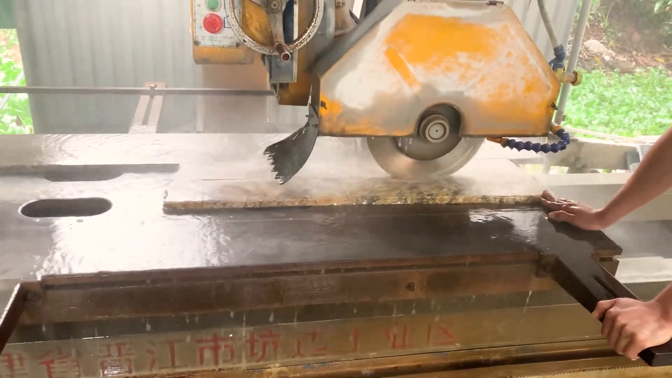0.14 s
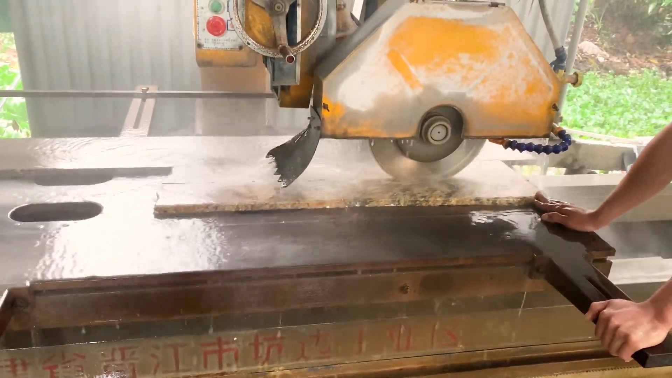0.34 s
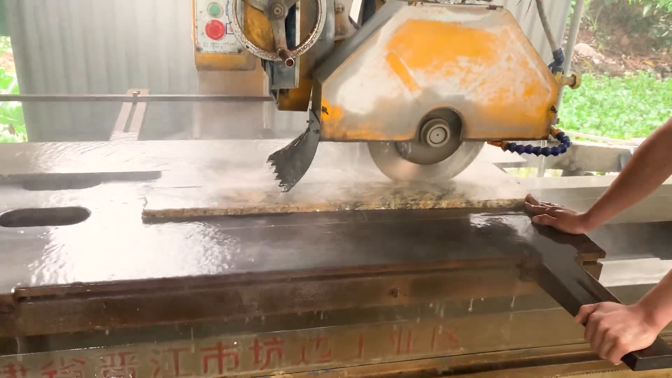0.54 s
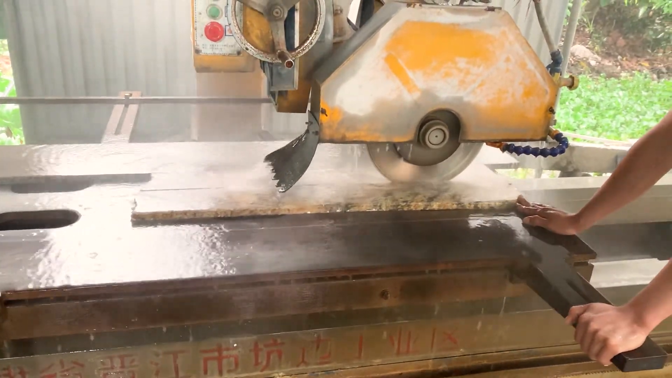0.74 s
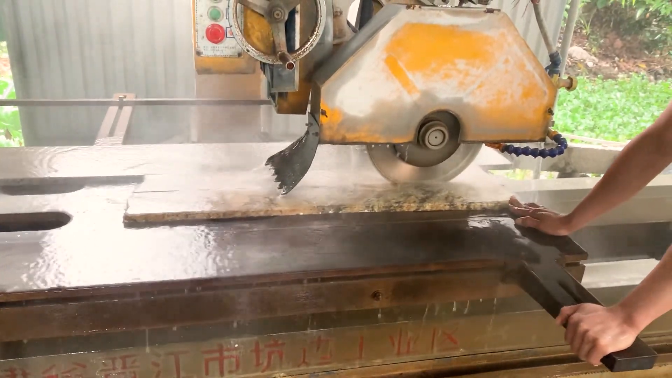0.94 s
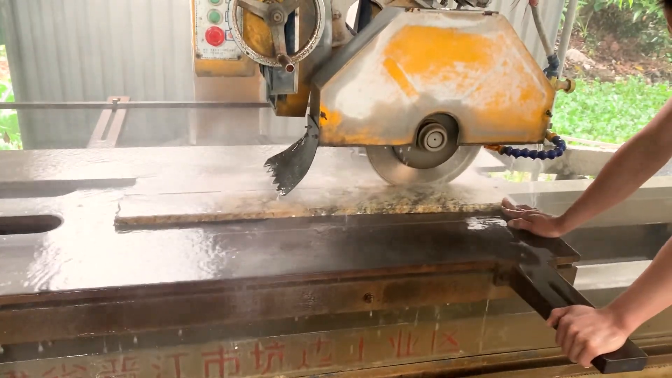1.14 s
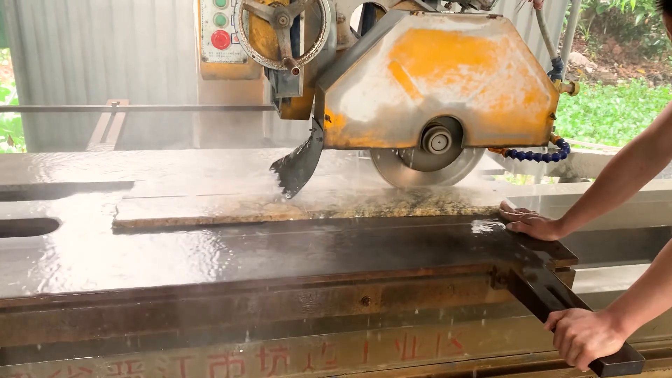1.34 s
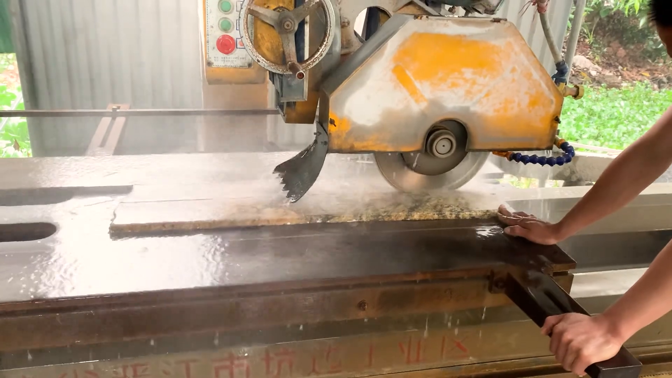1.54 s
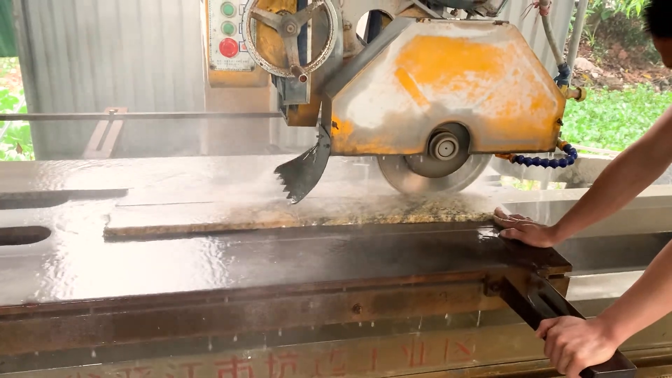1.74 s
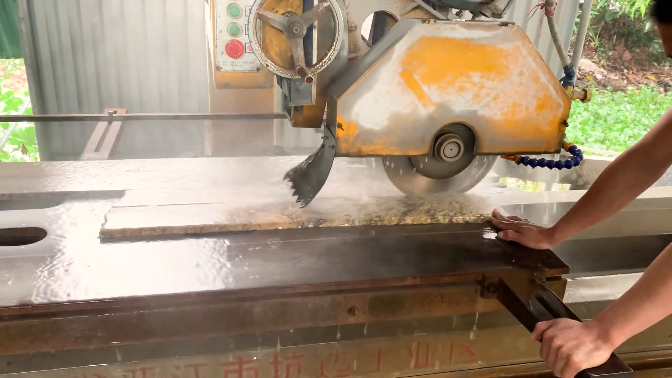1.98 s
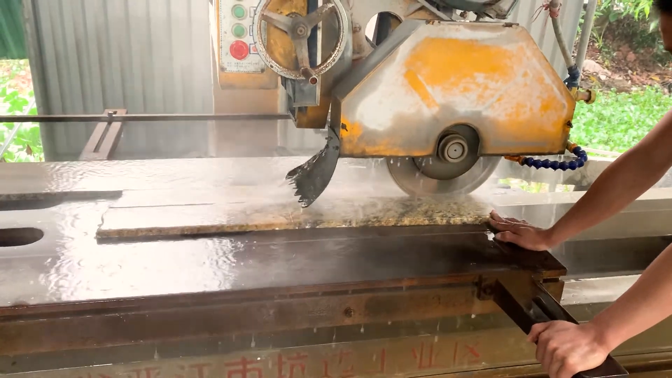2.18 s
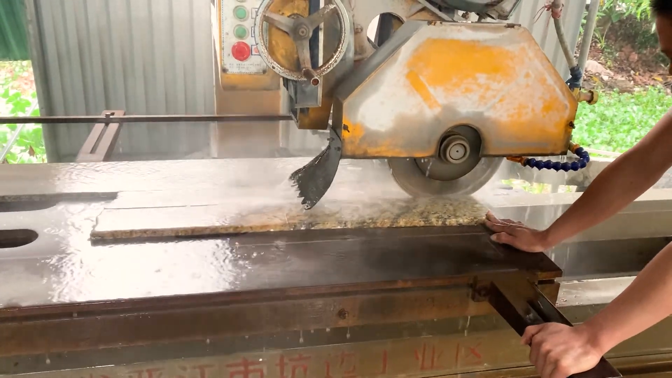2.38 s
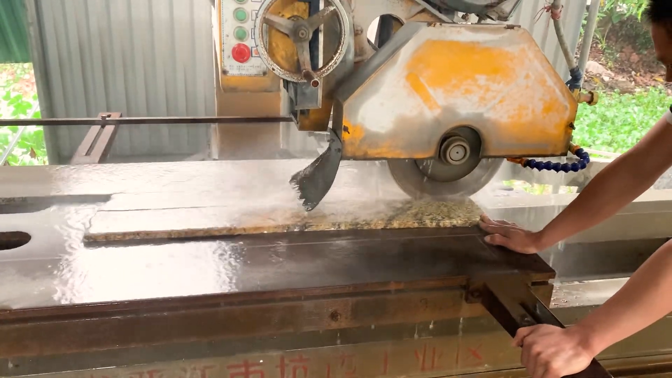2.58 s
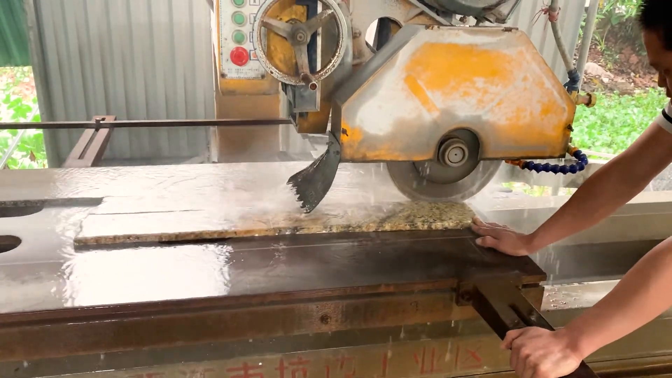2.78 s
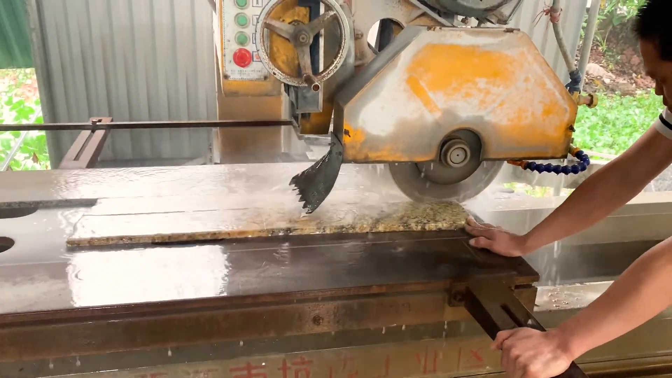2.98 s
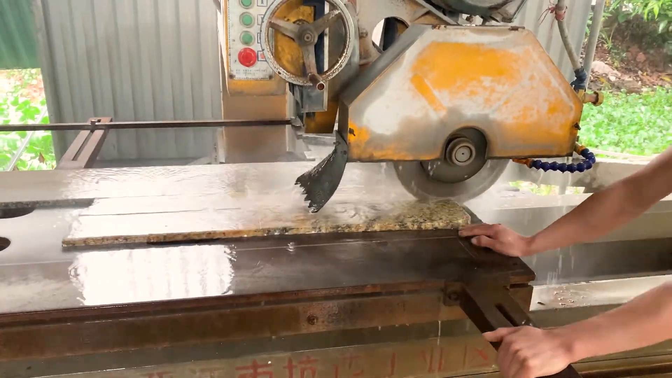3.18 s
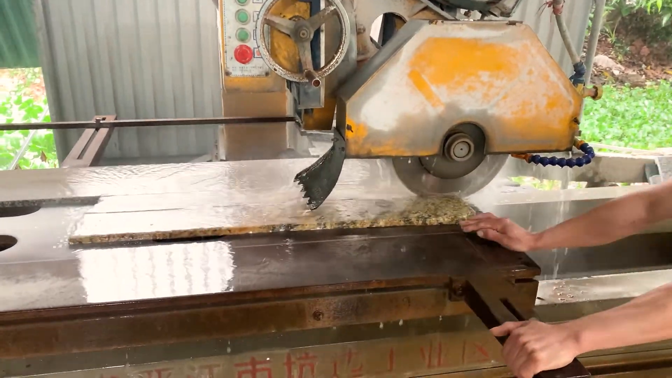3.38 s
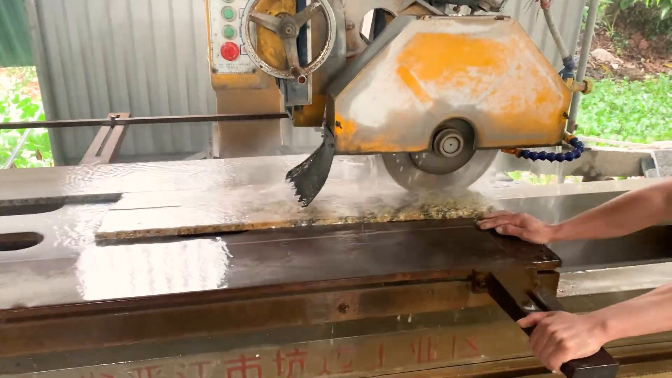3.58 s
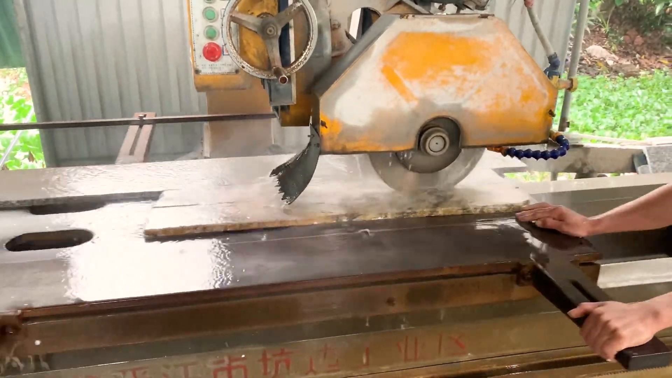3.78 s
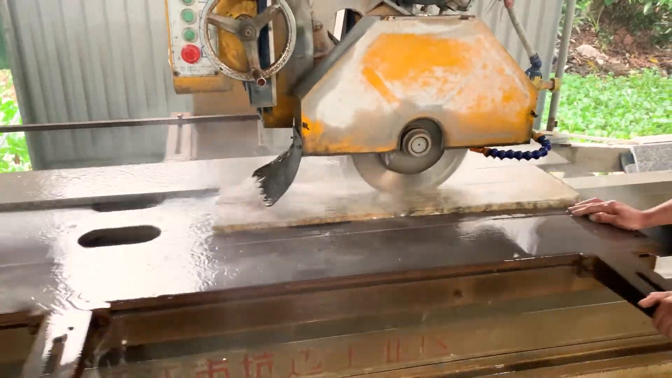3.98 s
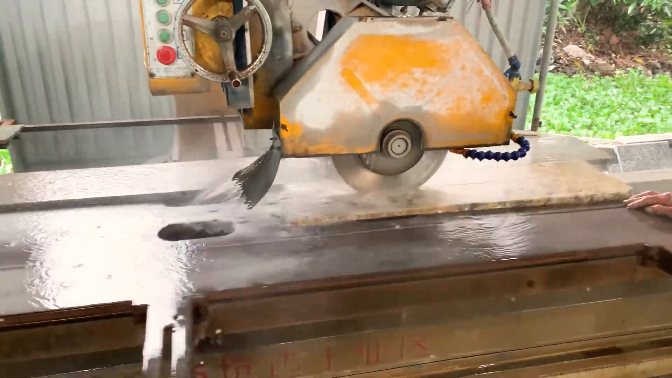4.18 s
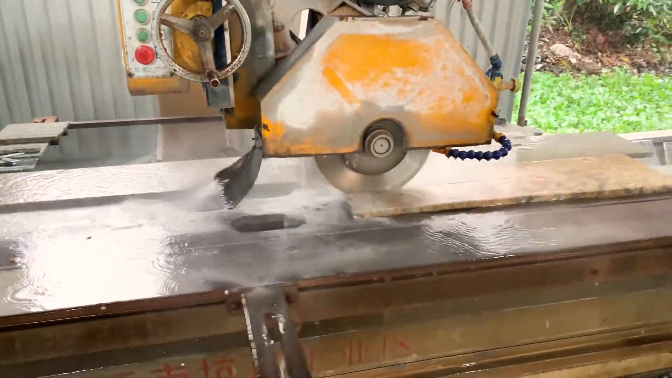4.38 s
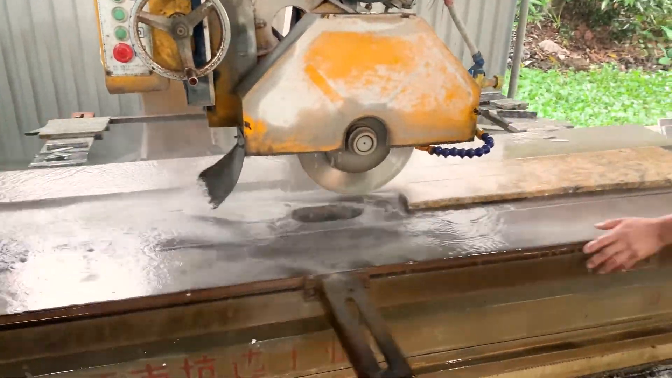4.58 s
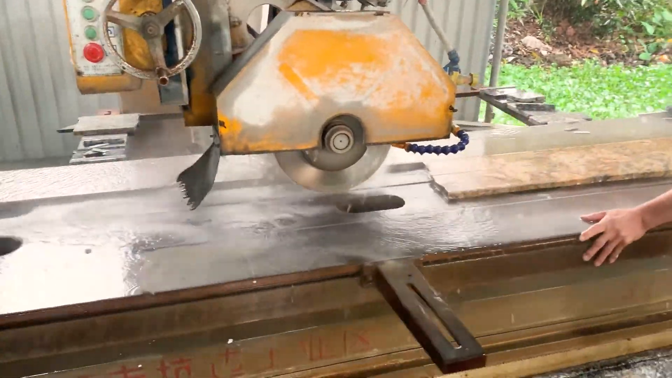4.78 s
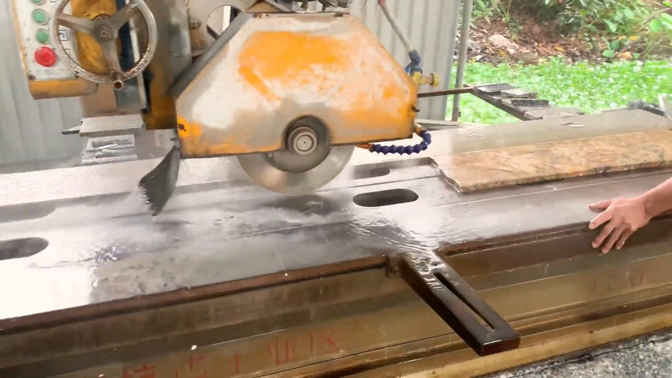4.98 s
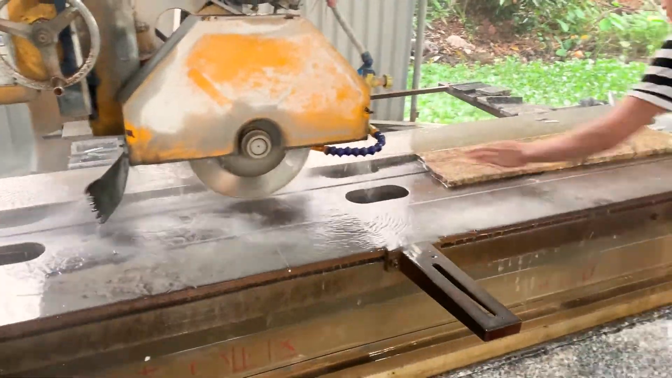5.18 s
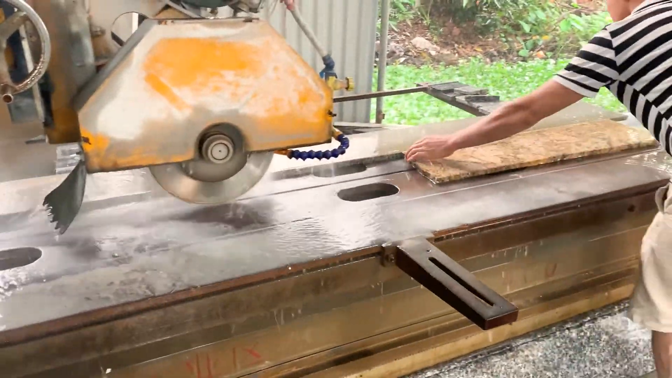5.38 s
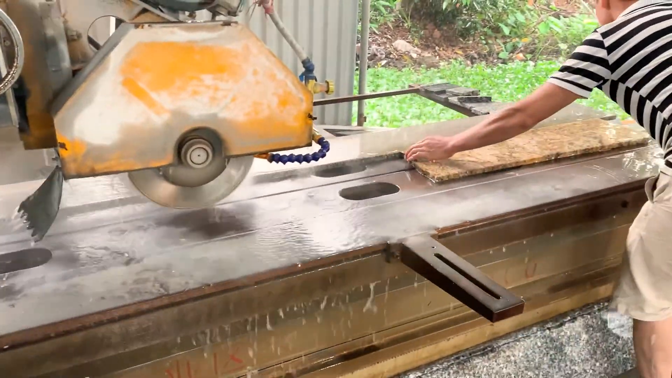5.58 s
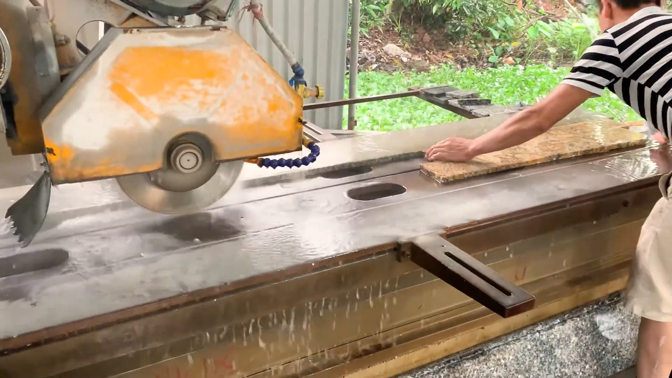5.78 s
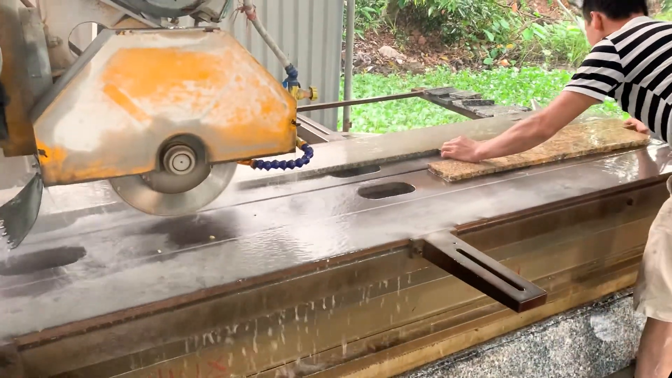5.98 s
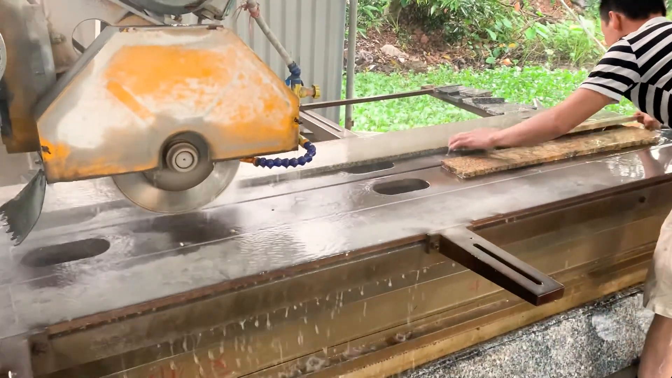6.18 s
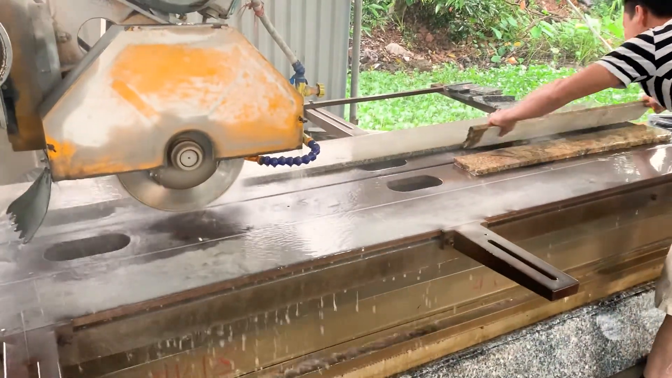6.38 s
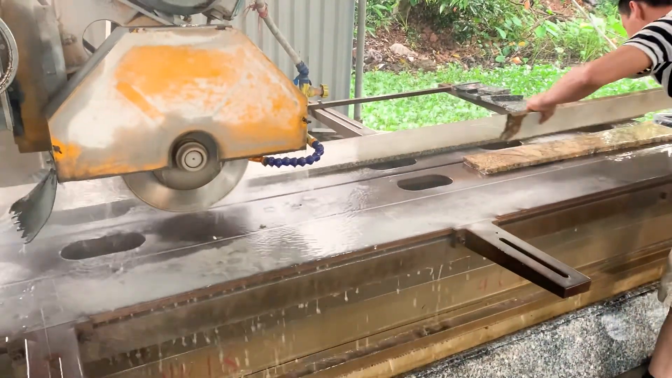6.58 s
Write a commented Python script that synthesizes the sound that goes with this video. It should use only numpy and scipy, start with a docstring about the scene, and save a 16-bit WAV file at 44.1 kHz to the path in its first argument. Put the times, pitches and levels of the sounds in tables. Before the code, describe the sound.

A water-cooled stone saw whines and rasps loudly through granite, breaks out and spins free over quiet wet wash, then a harsh electric buzz starts.

```python
"""A water-cooled saw cuts a granite slab in an open workshop, close to the microphone.
Its uneven rim rasps as a comb of multiples of the blade speed; its 24 diamond segments make the disc whine,
drone and squeal, and filtered noise makes the hiss of grit and spray.
The blade breaks out of the slab and spins free over a bed of wash, hum and faint whistles.
A second later a mains-driven machine starts to buzz: harmonics of about 100 Hz with hiss."""
import sys
import numpy as np
from scipy import signal
from scipy.fft import rfft, irfft
from scipy.io import wavfile
from scipy.ndimage import uniform_filter1d, map_coordinates

SR = 44100
rng = np.random.default_rng(int(sys.argv[2]) if len(sys.argv) > 2 else 0)


def transcribe(u):
    """Save the signal u as a 16-bit wav file named by the first command-line argument.

    u: samples, shape (n,) or (channels, n), limited to [-1, 1]; the rate is SR.
    q: integer samples, one column per channel.
    """
    v = np.clip(np.atleast_2d(u).T, -1, 1)
    q = np.round(v * 32767).astype(np.int16)
    wavfile.write(sys.argv[1], SR, q)


N = 292824
TIME = np.arange(N) / SR

# blade speed, rising overall as the load goes [t/s, turns per second]
SPEED = [(0, 80.68), (.4, 80.8), (1.8, 80.87), (2.5, 80.93), (2.8, 81.1), (3.2, 81.22), (3.7, 81.3),
         (4.3, 81.23), (4.7, 81.3), (6.64, 81.33)]
# how far the blade has left the slab [t/s, 0 = deep in it .. 1 = breaking out of its edge]
BREAKOUT = [(2.6, 0.065), (2.85, 1)]
# level changes of the cut [t/s, rasp/dB, treble rasp/dB, grinding/dB, treble spray/dB]
CUT = [(0, 1.5, 3.5, -1, 0), (.6, 0, 1, -0.5, -1), (1.2, 0, -1, -0.5, -1), (1.8, 0.5, 0, -2, -3),
       (2.05, -0.5, -3, -9, -4), (2.9, -2, 2, -3, -1.5), (3.35, -3.5, 4, -4, -2.5), (3.7, -.5, -1, -1, 1.5),
       (4.4, -3.5, 1.5, -2, -0.5)]
# a mode of the disc locks on to a multiple of the blade speed [full from t/s, hold/s, multiple, level/dB]
SQUEALS = [(0, .95, 30, -43.5), (0, .95, 75, -37), (0.306, 0.58, 9, -51), (0.34, 0.3, 86, -38),
           (0.353, 0.746, 72, -36.5), (1.257, 0.83, 72, -43.5), (2.51, 0.32, 18, -44.5),
           (2.856, .14, 10, -46), (2.933, 0.063, 18, -37), (3.062, 0.31, 35, -34), (3.46, 0.31, 18, -45.5),
           (3.46, 0.069, 21, -39), (3.674, 0.24, 21, -37), (3.777, 0.53, 72, -46), (3.876, 0.54, 30, -38.5),
           (3.937, 0.5, 10, -51), (3.984, 0.37, 18, -42), (4.0, 0.37, 21, -40.5), (4.15, 0.084, 64, -45.5)]
# stereo width of the cut [f/Hz, side minus mid/dB]
CUT_WIDTH = [(60, -8), (110, -7), (200, -10), (380, -11), (700, -2), (1290, -5), (2380, -12), (2950, -1),
             (4400, -3.5), (8120, 1.5), (15000, -1)]
# stereo width of the free blade, the motor and the buzz [f/Hz, side minus mid/dB]
FREE_WIDTH = [(60, -7), (110, -20), (200, -18), (380, -6), (700, -2.5), (1290, -1.5), (2380, -3),
              (4400, -0.5), (8120, -2), (15000, 2)]

SEGMENTS = 24
DRONE_MULTIPLE = 5  # of the blade speed, heard from the loaded blade
SQUEAL_ATTACK_S, SQUEAL_RELEASE_S = 0.11, 0.067
BUZZ_HZ = 99.92  # twice the mains frequency


def rasp(turns):
    """The uneven rim scrapes the same way on each turn: a comb of multiples of the blade speed."""
    # base level of the multiples [f/Hz, deep level/dB, breaking-out level/dB]
    comb = [(80, -82, -89), (323, -74.5, -70), (720, -63, -65), (1210, -62.5, -68), (2230, -62.5, -65),
            (3260, -52, -51.5), (4070, -56.5, -64.5), (4700, -56.5, -56.5), (5540, -88, -83),
            (5970, -53, -62.5), (8400, -58, -62.5), (11400, -53, -59), (13700, -58, -64), (15400, -71, -77)]
    # multiples with a level of their own [multiple, deep level/dB, breaking-out level/dB]
    peaks = [(3, -62, -73), (6, -65.9, -58.6), (7, -57.3, -65.2), (13, -61.5, -57.4), (16, -50.3, -56.0),
             (17, -46.1, -52.6), (18, -51, -58), (19, -46.1, -47.5), (20, -48.5, -55.3), (21, -40.3, -47),
             (22, -45.2, -45.1), (23, -40.8, -45), (25, -45.1, -46.7), (26, -49.2, -54.8),
             (27, -46.3, -50.9), (29, -47.0, -45.1), (30, -52, -48), (31, -56.1, -46.1), (33, -47.1, -50.2),
             (34, -44.2, -49.1), (35, -46, -49), (36, -39.5, -49.0), (37, -39.5, -45.6), (38, -51.3, -46.5),
             (60, -49.0, -59.1), (70, -48.0, -62.4), (72, -49, -53), (75, -44.5, -57.3), (84, -47.5, -51.4),
             (86, -46.0, -53.3), (132, -45.5, -57.6)]
    # which port the scrape reaches first [f/Hz, share of multiples that lead on the left]
    left_share = [(1700, .9), (2400, .5), (2900, .05), (3800, .5)]
    # smear of the stroke: clear in the mids, almost none left in the treble
    mid_scatter_rad, treble_scatter_rad = 1.77, 2.93

    s = np.interp(np.arange(int(turns[-1]) + 2), turns, TIME)[:, None]  # start of each turn
    hz = np.arange(1, 195) * np.mean(curve(SPEED, TIME))
    share = treble(hz)
    out = curve(BREAKOUT, s[:, 0])
    level = staged(comb, s, hz)
    # the crowded high modes of the disc favour some multiples, and others as the contact moves
    level += 3 * share * drift(level.shape, 200)
    for multiple, deep_db, out_db in peaks:
        level[:, multiple - 1] = (1 - out) * deep_db + out * out_db
    level += (1 - share) * curve(CUT, s) + share * curve(CUT, s, axis=2)
    # the rim stops scraping before the spray dies
    gains = amp(level + fade_db(s, start=4.43, db_per_s=104))

    # a multiple that sings is a pure tone instead
    gains[:, [DRONE_MULTIPLE - 1, SEGMENTS - 1]] = 0
    for start, length, multiple, _ in SQUEALS:
        gains[:, multiple - 1] *= 1 - squeal_gain(s[:, 0], start, length)

    # the contact grows unsteady at the edge of the slab
    flutter_db = 1.88 + 2.72 * out[:, None]
    scatter = mid_scatter_rad + (treble_scatter_rad - mid_scatter_rad) * share
    return rotor(turns, gains, hz, CUT_WIDTH, spectrum(left_share, hz), scatter,
                 wear=0.38, wear_turns=64, flutter_db=flutter_db)


def singing(turns):
    """The segments drive modes of the steel disc: a whine, its lower octave, a drone and passing squeals."""
    # whine at the rate of the segments [t/s, level/dB]
    segment_whine = [(0.0, -30), (0.06, -33), (0.23, -36), (0.38, -32.5), (2.38, -29), (2.68, -31),
                     (2.77, -27), (3.15, -33.5), (3.29, -27), (3.52, -44.5), (3.64, -34), (3.68, -53),
                     (3.92, -34), (3.95, -33), (4.39, -31), (4.55, -50), (4.6, -74)]
    # whine an octave below, while the blade is deep in the slab [t/s, level/dB]
    half_whine = [(0.0, -38.5), (0.14, -38), (0.58, -50), (0.98, -43), (1.87, -42), (1.99, -51),
                  (2.46, -43), (2.68, -55), (2.8, -81)]
    # low drone of the loaded blade [t/s, level/dB]
    drone = [(.15, -53), (.35, -49), (2.55, -51), (3.2, -53), (3.5, -49), (4.3, -47.5), (4.47, -50),
             (4.66, -62)]

    out = np.zeros((2, N))
    voices = [(SEGMENTS, segment_whine), (SEGMENTS // 2, half_whine), (DRONE_MULTIPLE, drone)]
    for multiple, level in voices:
        out += lasting(level, TIME) * disc_tone(turns, multiple, flutter_db=1.05)
    for start, length, multiple, db in SQUEALS:
        on = (TIME > start - SQUEAL_ATTACK_S) & (TIME < start + length + SQUEAL_RELEASE_S)
        gain = amp(db) * squeal_gain(TIME[on], start, length)
        out[:, on] += gain * disc_tone(turns[on], multiple, flutter_db=2.5)
    return out


def squeal_gain(s, start, length):
    """A squeal swells up to its start time, holds and dies away."""
    swell = ramp(s, start - SQUEAL_ATTACK_S, SQUEAL_ATTACK_S)
    return (swell * (1 - ramp(s, start + length, SQUEAL_RELEASE_S))) ** 2


def disc_tone(turns, multiple, flutter_db):
    """A nearly pure tone at one multiple of the blade speed, as the two ports hear it."""
    # where the main tones sit {multiple: (left minus right/dB, left lead/rad)}
    places = {5: (-3.8, .3), 12: (2, 0), 21: (-2, .2), 24: (-.6, .05), 72: (0, -.4)}

    waver = 0.079 * wander(0.071, size=len(turns))  # rad
    angle = 2 * np.pi * (multiple * turns + rng.random()) + waver
    left_db, lead = places.get(multiple, (0, .9))
    left = amp(left_db / 2) * np.sin(angle + lead / 2)
    right = amp(-left_db / 2) * np.sin(angle - lead / 2)
    flutter = amp(flutter_db * wander(0.1, size=len(turns)))
    return np.sqrt(2) * flutter * np.array([left, right])


def grinding(turns):
    """Crushed grit and spray hiss, throbbing a little with each turn."""
    # base level of the hiss [f/Hz, deep level/dB per Hz, breaking-out level/dB per Hz]
    grit = [(40, -112, -114), (159, -94, -100.5), (1190, -85.2, -85.5), (1500, -74.5, -78),
            (1980, -67, -68), (2500, -75, -69.5), (3160, -72.5, -69.5), (3740, -78, -77.5),
            (5500, -78.5, -83.5), (5870, -74, -70), (8500, -74, -76), (11800, -69.5, -71.5),
            (14000, -75, -76), (15600, -79, -82)]

    def field_db(s, hz):
        """Noise level by time and frequency until the spray dies."""
        share = treble(hz)
        strength_db = (1 - share) * curve(CUT, s, axis=3) + share * curve(CUT, s, axis=4)
        return staged(grit, s, hz) + strength_db + fade_db(s, start=4.55, db_per_s=288)

    # once and three times a turn
    throb = 1 + 0.092 * np.cos(2 * np.pi * turns) + 0.073 * np.cos(2 * np.pi * 3 * turns)
    surge_db = 0.5 * wander(0.033)
    return hiss(field_db, CUT_WIDTH, patchy_db=3.5) * throb * amp(surge_db)


def buzzing():
    """Steel chatters at twice the mains frequency, strongest above 2 kHz, its hiss pulsing each cycle."""
    # relative level of the harmonics [f/Hz, level/dB]
    harmonics = [(100, -38.5), (600, -25), (1200, -23), (1800, -32), (2500, -22), (3300, -27), (3800, -37),
                 (4200, -9), (4600, -37), (6500, -38), (8400, -35), (10000, -59), (13300, -40),
                 (15000, -61)]
    # harmonics with a relative level of their own [multiple, level/dB]
    peaks = [(7, -18), (13, -15), (14, -13), (16, -9), (20, -10), (21, 0), (22, 0), (23, -6), (24, -13),
             (25, -12), (28, -14), (30, -14), (40, -12), (41, -14), (42, -15), (59, -20), (133, -30)]
    # relative level of the hiss [f/Hz, level/dB per Hz]
    buzz_hiss = [(30, -95), (70, -85), (200, -61), (900, -63), (1500, -47.5), (2150, -42), (2700, -50),
                 (3500, -49.5), (4200, -47), (6000, -46), (7000, -56), (10000, -61.5), (13500, -56),
                 (15000, -85)]
    start_s, attack_s, build_s, build_db, full_db = 5.56, 0.061, 0.17, 4, -34

    cycles = BUZZ_HZ * TIME
    s = np.arange(int(cycles[-1]) + 2)[:, None] / BUZZ_HZ
    hz = np.arange(1, 151) * BUZZ_HZ
    level = spectrum(harmonics, hz)
    for multiple, db in peaks:
        level[multiple - 1] = db
    # the upper harmonics build up after the lower ones
    building_db = curve([(5.58, -0.5), (5.75, -1), (5.9, 0.5), (6.64, 0.5)], s)
    level = level - 3.5 + building_db * np.interp(hz, [2100, 2200], [0, 1])
    lines = rotor(cycles, amp(level), hz, FREE_WIDTH, left_first=0.82, scatter=1.08,
                  wear=0.099, wear_turns=64, flutter_db=2.0)

    puffs = hiss(lambda s, hz: spectrum(buzz_hiss, hz) + 0 * s, FREE_WIDTH, patchy_db=3.7)
    puffs = puffs * (1 + 0.13 * np.cos(2 * np.pi * cycles))
    # an abrupt start, a little more build, then a hold
    level_db = full_db - build_db * (1 - ramp(TIME, start_s + attack_s, build_s))
    return (lines + puffs) * ramp(TIME, start_s, attack_s) * amp(level_db)


def free_running():
    """The wet blade fans air and water and whistles faintly; the motor hums, all of it under the cut too."""
    # colour of the thrown air and water [f/Hz, relative level/dB per Hz]
    wash_colour = [(18, -92), (45, -60), (108, -6), (168, -17), (192, -10.5), (432, -8), (492, -4),
                   (561, -12.5), (622, -7), (970, -11.5), (1910, -2.5), (3680, -6.5), (5310, -0.5),
                   (6720, -12.5), (15500, -22.5)]
    # tones of the motor [f/Hz, level/dB]
    hum = [(199.8, -70), (300, -76), (500, -62), (613, -65.5)]
    # deepest hum, which comes and goes [t/s, level/dB]
    deep_hum_level = [(0, -71.5), (1.7, -69), (2, -80.5), (5.3, -90), (5.9, -68.5)]
    # blade whistles, which come and go [f/Hz, level/dB]
    whistles = [(1952, -62.5), (2799, -70.5), (3903, -66), (4947, -59), (5225, -59), (5577, -62),
                (5890, -58), (7806, -71)]
    held_down_db, recovered_db = -47.5, -43.5

    wash = hiss(lambda s, hz: spectrum(wash_colour, hz) + 0 * s, FREE_WIDTH, patchy_db=2.26)
    # the wash comes up as the recorder's gain recovers after the loud cut
    wash_db = held_down_db + (recovered_db - held_down_db) * ramp(TIME, start=4.64, length=0.19)
    wash = wash / wash.mean(0).std() * amp(wash_db)
    deep_hum = amp(curve(deep_hum_level, TIME)) * np.sqrt(2) * np.sin(2 * np.pi * BUZZ_HZ * TIME)
    motor = deep_hum + tones(hum, waver=0.48, flutter_db=1.5)
    return wash + motor + tones(whistles, waver=1.55, flutter_db=4.5)


def tones(lines, waver, flutter_db):
    """Lines that waver in phase (rad) and level and reach each port by different paths."""
    out = np.zeros((2, N))
    for hz, db in lines:
        angle = 2 * np.pi * hz * TIME + waver * wander(0.09)
        side = amp(spectrum(FREE_WIDTH, hz)) * rng.choice([-1, 1]) * np.cos(angle)
        gain = amp(db + flutter_db * wander(0.17)) * np.sqrt(2)
        out += gain * stereo(np.sin(angle), side)
    return out


def rotor(turns, gains, hz, width, left_first, scatter, wear, wear_turns, flutter_db, size=4096):
    """A rub that repeats every turn, slowly changing; gains is turns x multiples, scatter smears the stroke."""
    count = gains.shape[1]
    # gains has one row per turn; the phases wander slowly from turn to turn
    phase = scatter * rng.standard_normal(count) + wear * drift(gains.shape, wear_turns)
    mid = gains * amp(flutter_db * drift(gains.shape, 16.7)) * np.exp(1j * phase)
    # reflections put one port ahead or behind, by multiple, and shift as the microphone moves
    sign = np.where(rng.random(count) < left_first, 1, -1)
    lead = np.pi / 2 * sign + 0.63 * drift(gains.shape, 140)
    side = mid * amp(spectrum(width, hz)) * np.exp(1j * lead)
    # one waveform per turn, with an empty bin for the constant part
    bins = np.pad(stereo(mid, side), ((0, 0), (0, 0), (1, 0)))
    shapes = irfft(bins, size) * size / np.sqrt(2)
    # read along the turn while fading from each waveform to the next
    where = [turns, turns % 1 * size]
    return np.array([map_coordinates(shape, where, order=1, mode="grid-wrap") for shape in shapes])


def hiss(field_db, width, patchy_db):
    """Stereo noise from a rule (s, Hz) -> dB per Hz, with small drifting patches."""
    s = np.arange(N // 256 + 5) * 256 / SR
    hz = np.fft.rfftfreq(1024, 1 / SR)
    a, b, c, d, patches = rng.standard_normal((5, len(s), len(hz)))
    patches = uniform_filter1d(uniform_filter1d(patches, size=6, axis=0), size=7, axis=1)
    level_db = field_db(s[:, None], hz) + patchy_db * patches / patches.std()
    gain = amp(level_db) * np.sqrt(SR / 1024 * 3 / 2)  # density to the level of a bin
    z = gain * stereo(a + 1j * b, (c + 1j * d) * amp(spectrum(width, hz)))
    return signal.istft(z.transpose(0, 2, 1), nperseg=1024, noverlap=768)[1][:, :N]


def staged(rows, s, hz):
    """Blends the deep and the breaking-out spectrum as the blade leaves the slab."""
    out = curve(BREAKOUT, s)
    return (1 - out) * spectrum(rows, hz) + out * spectrum(rows, hz, axis=2)


def treble(hz):
    """Share 0-1 with which a frequency follows the treble controls."""
    return np.interp(hz, [3800, 5600], [0, 1])


def amp(db):
    """Decibels to gain."""
    return 10 ** (np.asarray(db) / 20)


def curve(rows, s, axis=1):
    """One column of a time table, read at the times s."""
    rows = np.array(rows, float)
    return np.interp(s, rows[:, 0], rows[:, axis])


def spectrum(rows, hz, axis=1):
    """One column of a spectrum, read on a log-frequency axis."""
    rows = np.array(rows, float)
    return np.interp(np.log(hz + 1), np.log(rows[:, 0] + 1), rows[:, axis])


def lasting(rows, s):
    """Gain of a level curve that dies away after its last point."""
    return amp(curve(rows, s)) * (1 - ramp(s, rows[-1][0], .02))


def ramp(s, start, length):
    """Rises from 0 to 1 over length seconds."""
    return np.clip((s - start) / length, 0, 1)


def fade_db(s, start, db_per_s):
    """Level that holds until start, then falls steadily."""
    return -db_per_s * np.maximum(s - start, 0)


def drift(shape, steps):
    """Slow chance of unit size along the first axis, smooth over so many steps."""
    z = rng.standard_normal(shape)
    smooth = np.exp(-(np.fft.rfftfreq(shape[0]) * steps) ** 2)
    z = irfft((rfft(z, axis=0).T * smooth).T, shape[0], axis=0)
    return z / z.std()


def wander(seconds, size=N):
    """Slow chance for every sample, smooth over so many seconds; unit size over the whole scene."""
    knots = TIME[::441]
    return np.interp(TIME[:size], knots, drift(knots.shape, seconds / knots[1]))


def stereo(mid, side):
    """Left and right from mid and side."""
    return np.array([mid + side, mid - side])


def scene():
    """The cut follows the turning of the blade; the free-running bed and the buzz keep their own time."""
    turns = np.cumsum(curve(SPEED, TIME)) / SR
    cut = rasp(turns) + singing(turns) + grinding(turns)
    return cut + buzzing() + free_running()


def record(dry):
    """A steep linear-phase low-pass limits the band."""
    edge_hz = 15750
    lowpass = signal.firwin(511, edge_hz, window=("kaiser", 9), fs=SR)
    return signal.oaconvolve(dry, lowpass[None], "same")


dry = scene()
out = record(dry)
transcribe(out)
```